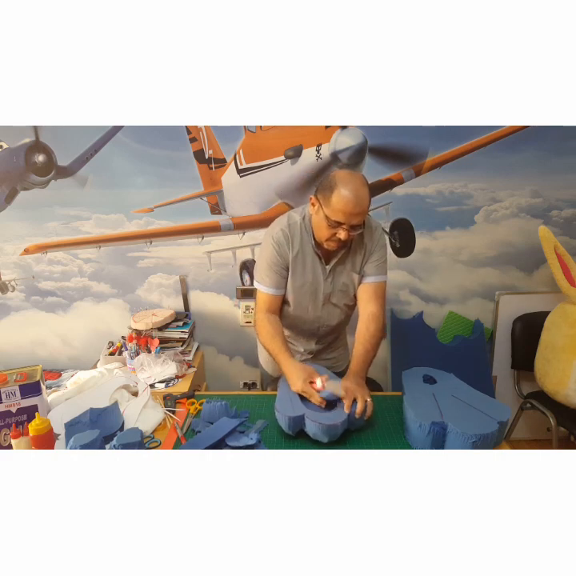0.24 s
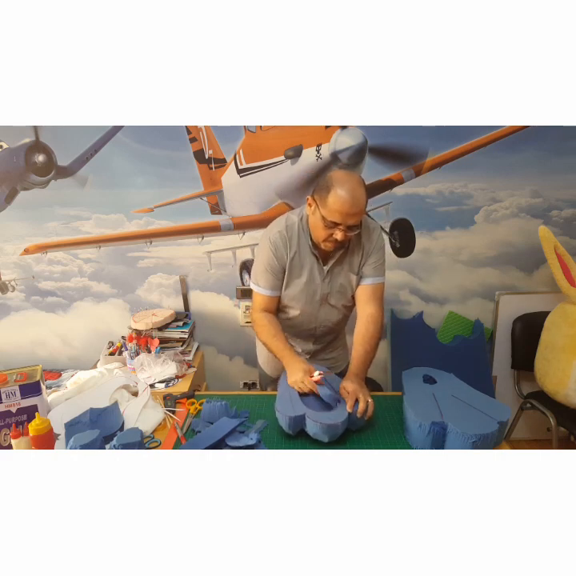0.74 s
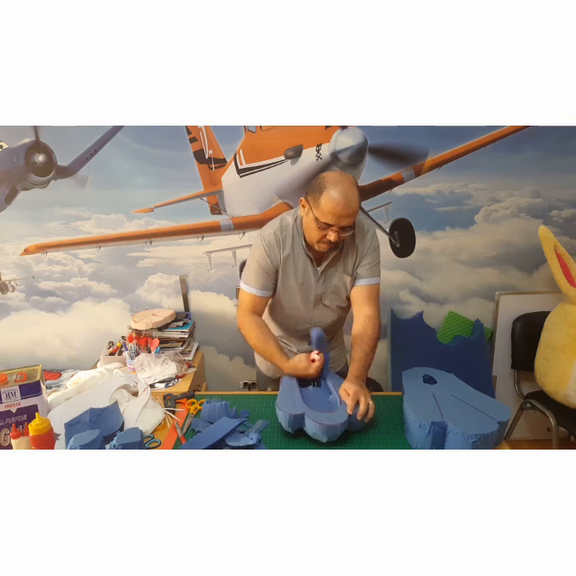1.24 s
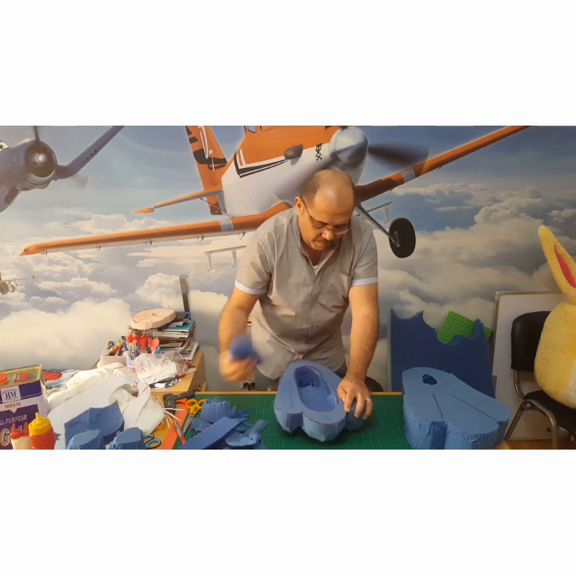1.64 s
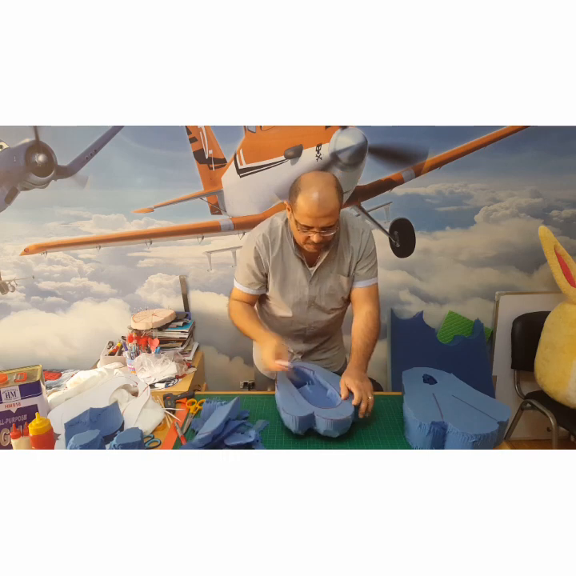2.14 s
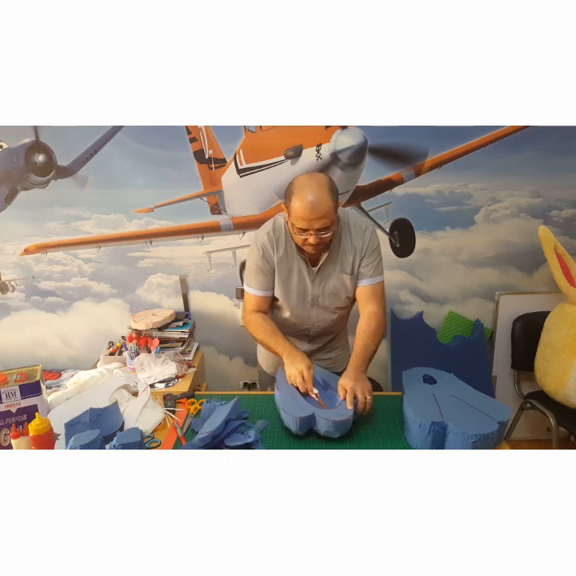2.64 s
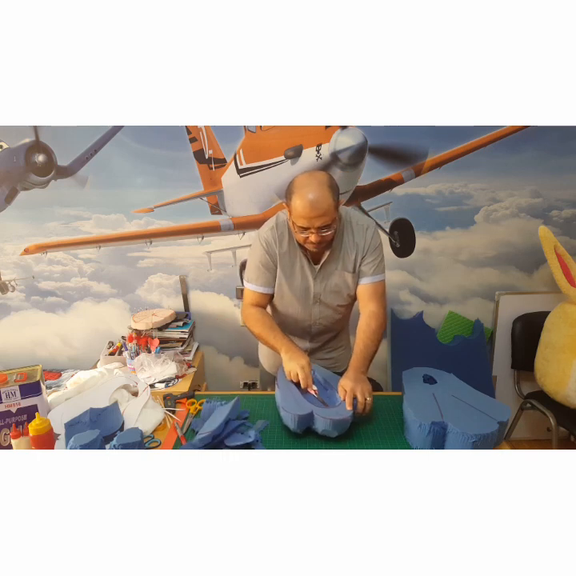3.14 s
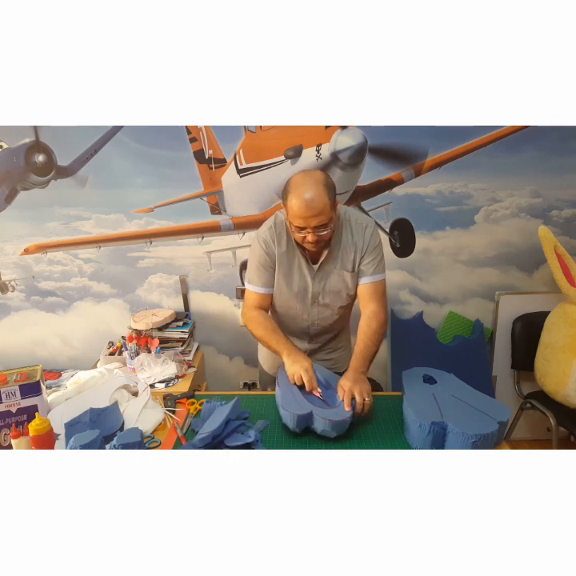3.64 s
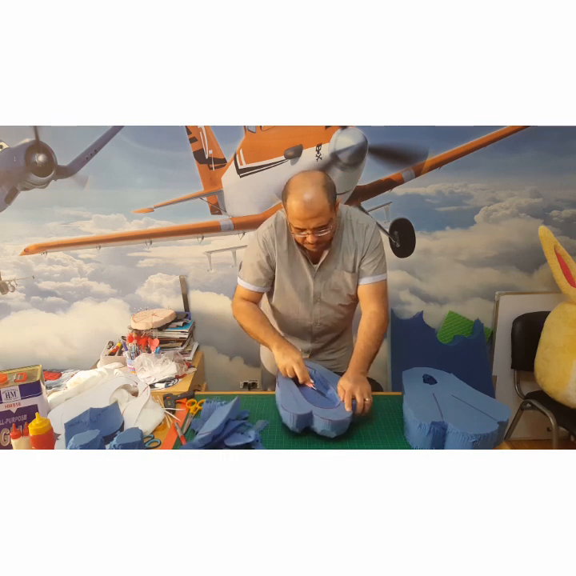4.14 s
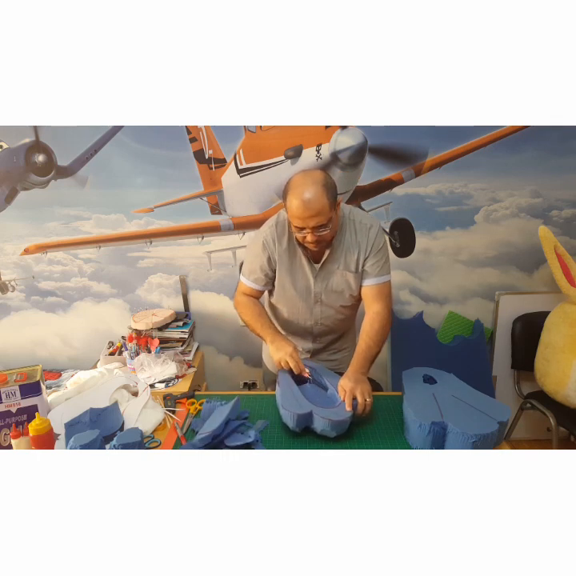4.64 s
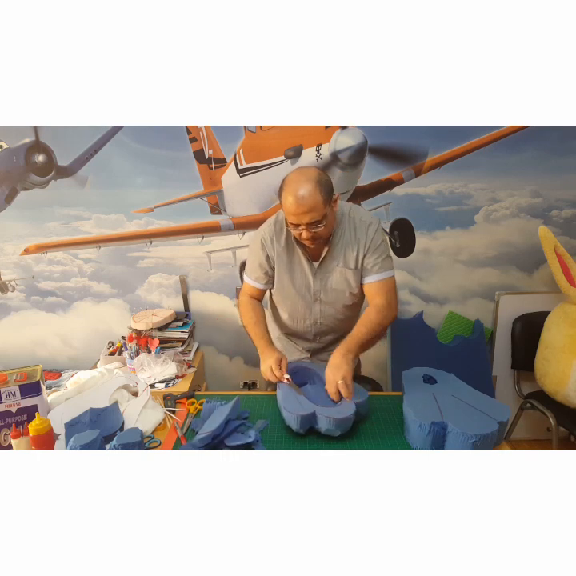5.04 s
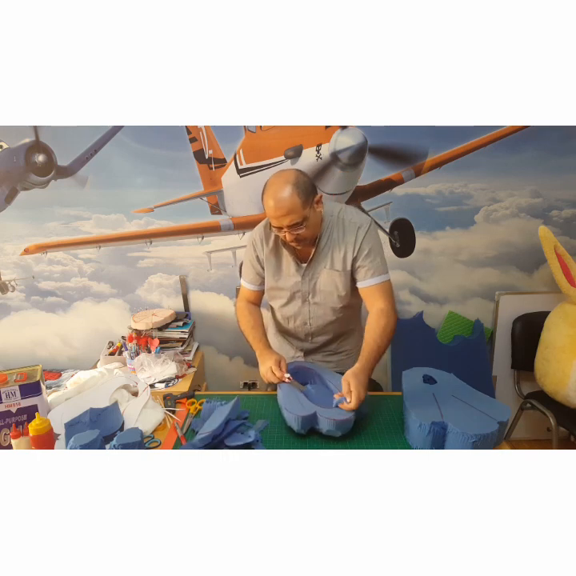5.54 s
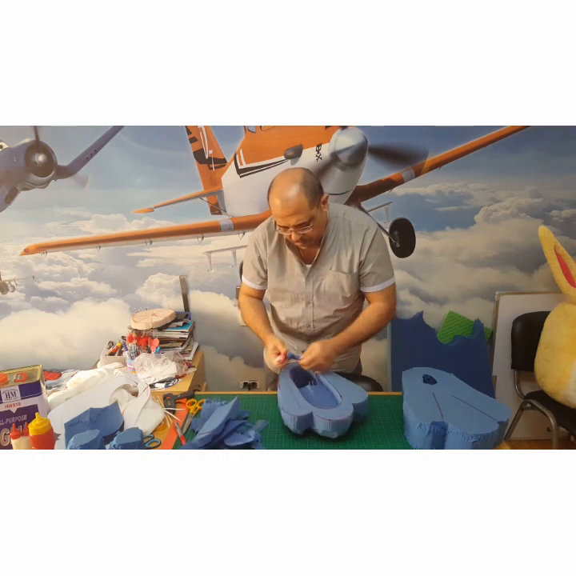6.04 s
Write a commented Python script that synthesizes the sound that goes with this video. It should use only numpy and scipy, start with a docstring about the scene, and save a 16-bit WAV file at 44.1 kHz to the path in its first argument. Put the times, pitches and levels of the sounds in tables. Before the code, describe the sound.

Hands rub and pull a block of foam, bumping it on a hollow workbench, with one loud thump and a dull snap. A knife then saws the foam in quick, grainy back-and-forth strokes that grow louder, its loose blade ticking in the handle. Another strong thump follows, then a few small pops and fading rubs. The microphone is across the bench in a mid-sized room with faint background hum and hiss.

```python
"""Hollow thumps and rubbing, then a grainy back-and-forth rasp: a snap-blade knife saws a block of foam.
The rasp is the sum of countless tearing cells, made uneven by stick-slip friction. The block and the
hands excite the modes of a hollow workbench, the loose blade ticks in its handle, and the foam snaps.
A small camera with two microphone ports listens from across the bench in a mid-sized room."""
import sys
import numpy as np
from scipy import signal
from scipy.fft import rfft, irfft, next_fast_len
from scipy.io import wavfile
from scipy.ndimage import uniform_filter1d

SR = 44100
rng = np.random.default_rng(int(sys.argv[2]) if len(sys.argv) > 2 else 0)


def generate_wav(signal):
    """Clip the signal to [-1, 1] and save it as 16-bit WAV at the path in sys.argv[1]."""
    frames = np.transpose(np.atleast_2d(signal))
    scaled = np.clip(frames, -1, 1) * 32767
    pcm = np.round(scaled).astype(np.int16)
    wavfile.write(sys.argv[1], SR, pcm)


N = 276932

# modes of the bench top: pitch_hz, level_db, t60_s
BENCH_MODES = [(62.3, -6, 0.17), (76, -18, 0.26), (90.3, -12.5, 0.78), (113.6, -10.5, 0.64),
               (136.6, -8, 0.22), (172.9, 0, 0.27), (204, -8.5, 0.11), (236, -2, 0.21), (323.7, -9.5, 0.2),
               (379.8, -7.5, 0.23), (488, -16, 0.37), (684, -9, 0.14)]
# left-right likeness of a diffuse field: frequency_hz, coherence
DIFFUSE_COHERENCE = [(100, 0.94), (300, 0.84), (700, 0.35), (1500, 0.076), (5000, 0.043)]


def foam_rasp():
    """Shot noise: tearing cells merge into a hail of clicks, whose drag also drives the bench modes."""
    # spectrum of the rasp: frequency_hz, relative_db
    spectrum = [(90, -32), (160, 1.5), (240, -6.5), (600, -8), (1300, -9.5), (2300, -10.5), (3500, -15.5),
                (5000, -19), (8000, -18.5), (16000, -27)]
    # left-right likeness of sound from all along the cut: frequency_hz, coherence
    cut_coherence = [(200, 1), (400, 0.85), (1400, 0.24), (3500, 0.42), (12000, 0.13)]
    gestures = strokes_and_rubs()
    force = sum(envelope for envelope, _, _ in gestures)
    bright_db = sum(envelope * db for envelope, db, _ in gestures) / force
    drag = sum(envelope * gain_of(db) for envelope, _, db in gestures)
    tear_sizes = gain_of(2 * np.minimum(rng.exponential(1, (2, N)), 4))
    tears = tear_sizes * (rng.random((2, N)) < 9000 / SR)  # about 9000 cells a second
    stick_slip = gain_of(0.95 * unit_rms(uniform_filter1d(rng.standard_normal(N), size=200)))
    clicks = unit_rms(tears * rng.standard_normal((2, N)))
    hail = unit_rms(stick_slip * (clicks + rng.standard_normal((2, N))))
    hz, t, spectra = signal.stft(hail, SR, nperseg=512, noverlap=384)
    flicker_db = 1.09 * patches(rng.standard_normal(spectra[0].shape), bins=5, frames=10)
    treble = np.clip(np.log2(hz / 1500 + 1e-3) / 3, 0, 1)[:, None]
    tilt_db = treble * np.interp(t, np.arange(N) / SR, bright_db)
    colour_db = curve_at(spectrum, hz)[:, None]
    band_rms = np.sqrt(np.sum(gain_of(2 * colour_db[(hz > 1500) & (hz < 8000)])) / len(hz))
    spectra = cohere(spectra, hz, cut_coherence) * gain_of(colour_db + tilt_db + flicker_db) / band_rms
    rasp = signal.istft(spectra, SR, nperseg=512, noverlap=384)[1][:, :N]
    smooth_force = uniform_filter1d(force, size=400)  # a hand cannot change its force at once
    shaking = signal.oaconvolve(drag * hail[0], ring(BENCH_MODES, spread_db=5.0, rise_s=0.0022))[:N]
    return smooth_force * rasp + gain_of(-36.5) * shaking


def strokes_and_rubs():
    """Friction follows the hand's force: returns (envelope, bright_db, drag_db) for each gesture."""
    # saw strokes, push and pull in turn: start_s, length_s, level_db
    strokes = [(2.575, 0.035, -75.5), (2.675, 0.094, -68), (2.84, 0.096, -64), (2.98, 0.068, -62.5),
               (3.12, .12, -64), (3.285, 0.076, -59), (3.415, 0.11, -56.5), (3.565, 0.087, -59),
               (3.72, 0.093, -49.5), (3.885, 0.078, -59), (4.015, 0.13, -51.5), (4.185, .1, -59.5),
               (4.325, 0.13, -49.5), (4.535, 0.025, -52.5), (4.65, 0.09, -55), (4.78, 0.092, -73)]
    # hands rub, pull and tear the foam: peak_s, level_db, swell_db_per_s, fade_db_per_s, bright_db
    rubs = [(0.005, -40.5, 273, 147, -10.5), (0.37, -62, 116, 106, -5.5), (0.43, -63.5, 64, 132, -8),
            (0.573, -51.5, 319, 218, -7), (0.771, -60.5, 182, 80, -7), (0.955, -63, 302, 116, -29),
            (1.272, -45, 181, 122, -3), (1.486, -54.5, 310, 136, -5), (1.95, -68.5, 155, 27, -5.5),
            (2.14, -85, 295, 84, 4), (2.45, -73, 402, 90, -3), (4.956, -57.5, 607, 233, -18),
            (5.07, -60.5, 74, 126, -0.5), (5.285, -53.5, 204, 91, -13), (5.458, -58.5, 500, 44, -2),
            (5.69, -70.5, 106, 138, 10), (5.89, -80, 108, 86, -2), (6.27, -73.5, 125, 100, 4)]
    bite_s, dull_db_per_s, lift_db_per_s = 0.043, 36, 241  # a stroke bites, dulls and dies at the turn
    hand_drag_db = -33
    t = np.arange(N) / SR
    gestures = [(gain_of(-83.5) * np.ones(N), 0, hand_drag_db)]  # faint, unbroken rubbing
    for k, (start_s, length_s, db) in enumerate(strokes):
        age = t - start_s
        bite = np.clip(age / bite_s, 0, 1) ** 2
        envelope = bite * gain_of(db - lift_db_per_s * np.maximum(age - length_s, 0))
        bright_db, drag_db = (4, 10.5) if k % 2 else (2.5, 7.5)  # pull, else push
        effort_db = db + 60  # harder strokes are slightly duller and couple less to the bench
        bright_db = bright_db - 0.1 * effort_db - dull_db_per_s * np.clip(age, 0, length_s)
        gestures.append((envelope, bright_db, drag_db - 1.66 * max(effort_db, -3.5)))
    for peak_s, db, swell, fade, bright_db in rubs:
        envelope = gain_of(db - np.maximum(swell * (peak_s - t), fade * (t - peak_s)))
        gestures.append((envelope, bright_db, hand_drag_db))
    return gestures


def bench_thumps():
    """Modal excitation: a blow favours the modes that move at the spot struck; a hard one adds a knock."""
    # blows on the bench: start_s, level_db, hardness_db, spot_hz, spot_boost_db
    blows = [(0.004, -33.5, -58, 59.5, 4), (0.318, -43, -40, 133, 11), (0.511, -38, -31, 233, 10),
             (0.58, -39.5, -28, 168, 9), (0.832, -47, -6.5, 113, 6), (1.071, -47, -25, 179, 11.5),
             (1.259, -22, -6, 200, 9), (1.299, -36, -19, 238, 4), (1.368, -34.5, -31, 115, 7.5),
             (1.489, -37, -6, 345, 12), (1.561, -45.5, -58, 115, 8), (1.923, -37.5, -33, 200, 12),
             (1.987, -47, -35, 71, 14.5), (2.443, -48.5, -19, 170, 16), (4.945, -23, -9.5, 234, 8),
             (4.989, -38, -25, 315, 19), (5.274, -41, -30, 340, 6), (5.453, -44, 1, 118, 4.5),
             (5.652, -40.5, -51, 176, 9), (5.69, -45.5, -17, 70, 11)]
    spot_octaves = 0.61
    out = np.zeros(N)
    for start_s, db, hardness_db, spot_hz, boost_db in blows:
        decay_scale = 1 - 0.012 * (db + 50)  # a harder blow rests on the top and damps it
        modes = []
        for hz, mode_db, t60_s in BENCH_MODES:
            coupling = np.exp(-(np.log2(hz / spot_hz) / spot_octaves) ** 2)
            modes.append((hz, mode_db + boost_db * coupling, t60_s * decay_scale))
        add(out, start_s, gain_of(db) * ring(modes, spread_db=0.5, rise_s=0.004))
        add(out, start_s, gain_of(db + hardness_db) * noise_burst(390, 1640, fade_s=0.009))
    return out


def blade_ticks():
    """Free vibration of thin steel after impact; grip and depth in the foam bring out a pair of modes."""
    # blade against handle: start_s, level_db, ring_hz, ring_db, sharpness_db
    ticks = [(2.1261, -52, 2560, -2.5, 0), (2.4376, -52.5, 3920, -4, 2), (2.5846, -51, 4050, -12, 0.5),
             (2.6094, -59, 2970, 11, -12), (2.9224, -52.5, 1310, 6, 7), (3.1536, -44, 2270, -5, 4.5),
             (3.4563, -46.5, 1720, -16, 8), (4.2263, -54, 3950, 10, -8), (4.4424, -30.5, 3646, -6, 4.5),
             (4.562, -44.5, 3820, -2, 8), (4.655, -52.5, 3030, 5, 9.5), (4.6869, -31.5, 3140, 2, -10),
             (4.7248, -32, 3074, 4, -2), (4.7443, -39, 3060, 1, -9), (5.067, -50, 2940, 8, 3)]
    # modes of the blade: pitch_hz, level_db, t60_s
    steel_modes = [(1300, -8.5, 0.031), (2016, -1.5, 0.016), (2870, -8, 0.017), (2920, -14, 0.16),
                   (3200, -22, 0.22), (3750, -4.5, 0.016), (6300, -6, 0.041), (8820, -7, 0.016)]
    pair_t60_s = 0.048
    out = np.zeros(N)
    for start_s, db, hz, ring_db, sharpness_db in ticks:
        pair = [(hz, ring_db, pair_t60_s), (hz * 0.69, ring_db - 8.0, pair_t60_s)]
        add(out, start_s, gain_of(db) * ring(steel_modes + pair, spread_db=1.5, rise_s=0.00018))
        add(out, start_s, gain_of(db + sharpness_db) * noise_burst(500, 6000, fade_s=0.0014))
    return out


def foam_snaps():
    """Cavity resonance: a hollow in the foam rings briefly after a dull pop and a puff of hiss."""
    # the foam snaps or is knocked: start_s, level_db, pitch_hz, hiss_db
    snaps = [(0.566, -41.5, 1620, -1.5), (0.945, -55, 1220, -1.5), (1.259, -35, 1164, -9.5),
             (1.484, -43, 1230, -2.5), (4.4412, -37.5, 796, -30), (5.241, -44.5, 830, -28),
             (5.275, -35, 750, -24), (5.449, -45, 1290, -2), (5.682, -40.5, 964, -9)]
    cavity_t60_s = 0.018
    out = np.zeros(N)
    for start_s, db, hz, hiss_db in snaps:
        add(out, start_s, gain_of(db) * noise_burst(hz * 0.54, hz * 2.11, fade_s=0.0044))
        add(out, start_s, gain_of(db - 4) * ring([(hz, 0, cavity_t60_s)], spread_db=0, rise_s=0.00037))
        add(out, start_s, gain_of(db + hiss_db) * noise_burst(2400, 9800, fade_s=0.016))
    return out


def direct_path(sound, left_lag_s=4.8e-5):
    """Path difference: the straight sound reaches the right port before the left."""
    size = next_fast_len(N)
    delay = np.exp(-2j * np.pi * np.fft.rfftfreq(size, 1 / SR) * left_lag_s)
    return np.array([irfft(rfft(sound[0], size) * delay, size)[:N], sound[1]])


def reflections(sound, build_s, decay_speed):
    """Reverberation: echoes of random sign build up, then each band decays exponentially."""
    # decay of the room, to be divided by decay_speed: frequency_hz, t60_s
    decay_times = [(150, 0.37), (500, 0.24), (1500, 0.26), (4000, 0.3), (10000, 0.1)]
    echoes = np.zeros((2, SR))
    arrivals = np.arange(40, SR - 20, 20) + rng.integers(0, 20, (2, (SR - 41) // 20))
    np.put_along_axis(echoes, arrivals, rng.choice([-1., 1.], arrivals.shape), 1)
    echoes *= 1 - np.exp(-(np.arange(SR) / SR / build_s) ** 2)
    hz, t, spectra = signal.stft(echoes, SR, nperseg=256)
    decay = gain_of(-60 * decay_speed * t / curve_at(decay_times, hz)[:, None])
    tail = signal.istft(cohere(spectra, hz, DIFFUSE_COHERENCE) * decay, SR, nperseg=256)[1]
    return signal.fftconvolve(sound[None], tail / np.linalg.norm(tail[0]), axes=1)[:, :N]


def room_tone():
    """Diffuse noise: room tone and microphone hiss drift faintly, alike at both ports only in the bass."""
    # spectrum of the background: frequency_hz, relative_db
    spectrum = [(20, -23), (50, 6.5), (250, -6.5), (600, -7), (1400, -15), (4000, -23), (8000, -26.5),
                (16000, -20)]
    hz = np.fft.rfftfreq(1024, 1 / SR)
    noise = rng.standard_normal((N // 256 + 5, 513, 5)).T
    drift_db = 2 * patches(noise[4], bins=10, frames=14)
    spectra = cohere([noise[0] + 1j * noise[1], noise[2] + 1j * noise[3]], hz, DIFFUSE_COHERENCE)
    spectra *= gain_of(curve_at(spectrum, hz)[:, None] + drift_db)
    return gain_of(-63) * unit_rms(signal.istft(spectra, nperseg=1024, noverlap=768)[1][:, :N])


def ring(modes, spread_db, rise_s):
    """Modal superposition: damped sines of alternating sign and slightly random strength, peak 1."""
    t = np.arange(round(max(mode[2] for mode in modes) * SR)) / SR
    scatter_db = spread_db * rng.standard_normal(len(modes))
    sound = sum((-1) ** k * gain_of(db + scatter_db[k] - 60 * t / t60_s) * np.sin(2 * np.pi * hz * t)
                for k, (hz, db, t60_s) in enumerate(modes))
    sound *= 1 - np.exp(-t / rise_s)
    return sound / abs(sound).max()


def noise_burst(low_hz, high_hz, fade_s):
    """Contact transient: a band of noise with exponential decay, peak 1."""
    t = np.arange(SR // 10) / SR
    band = signal.butter(3, [low_hz, high_hz], "band", fs=SR, output="sos")
    envelope = np.exp(-t / fade_s) * (1 - np.exp(-t / 0.00013))
    sound = envelope * signal.sosfilt(band, rng.standard_normal(len(t)))
    return sound / abs(sound).max()


def cohere(spectra, hz, coherence):
    """Partial coherence: two independent short-time spectra are mixed to share a common part."""
    shared = np.clip(curve_at(coherence, hz), -1, 1)[:, None]
    return np.array([spectra[0], shared * spectra[0] + np.sqrt(1 - shared ** 2) * spectra[1]])


def patches(noise, bins, frames):
    """Smooths noise over frequency and time, rms 1."""
    return unit_rms(uniform_filter1d(uniform_filter1d(noise, bins, axis=0), frames, axis=1))


def gain_of(db):
    """Decibels to an amplitude factor."""
    return 10 ** (np.asarray(db) / 20)


def unit_rms(x):
    """Scales to rms 1."""
    return x / np.sqrt(np.mean(x ** 2) + 1e-20)


def curve_at(points, hz):
    """Interpolates a table on a log-frequency axis."""
    table_hz, values = np.transpose(points)
    return np.interp(np.log(hz + 1), np.log(table_hz + 1), values)


def add(mix, start_s, sound):
    """Mixes a sound in at start_s."""
    part = mix[max(round(start_s * SR), 0):][:len(sound)]
    part += sound[:len(part)]


def scene():
    """Superposition of direct sound, wall echoes, clicks scattered by bench clutter, and room tone."""
    rasp, thumps, clicks = foam_rasp(), bench_thumps(), blade_ticks() + foam_snaps()
    clutter = reflections(gain_of(-6.5) * clicks, build_s=0.0042, decay_speed=9.3)
    to_walls = gain_of(-8.5) * rasp[0] + gain_of(-6.0) * thumps + clicks
    walls = reflections(to_walls, build_s=0.0033, decay_speed=0.72)
    return direct_path(rasp + thumps + clicks) + clutter + walls + room_tone()


def record(dry):
    """Linear filtering: the ports dull the deep bass and top octave, and a low-pass limits the band."""
    # response of the microphone ports: frequency_hz, gain_db
    response = [(22, -15), (50, -1), (8300, -4), (9800, -9.5), (11500, -6), (16000, -5)]
    size, cutoff_hz = next_fast_len(N), 15690
    port_gain = gain_of(curve_at(response, np.fft.rfftfreq(size, 1 / SR)))
    coloured = irfft(rfft(dry, size) * port_gain, size)[:, :N]
    sensitivity = gain_of([[.9], [-.9]])  # the left port is a little more sensitive
    low_pass = signal.firwin(511, cutoff_hz, window=("kaiser", 9), fs=SR)
    return signal.oaconvolve(coloured * sensitivity, low_pass[None], "same")


dry = scene()
out = record(dry)
generate_wav(out)
```